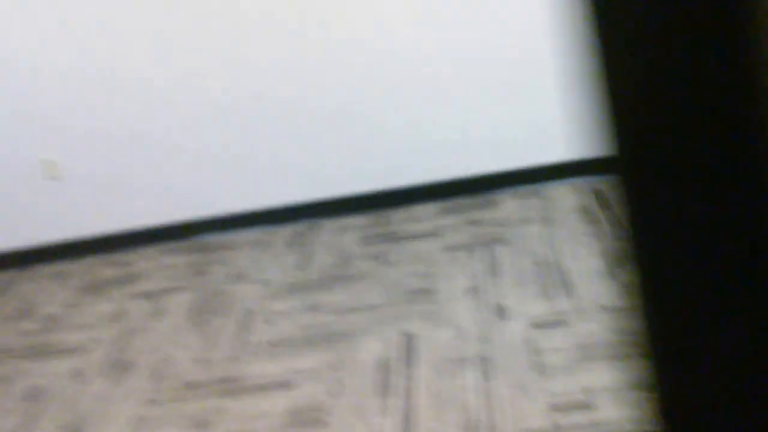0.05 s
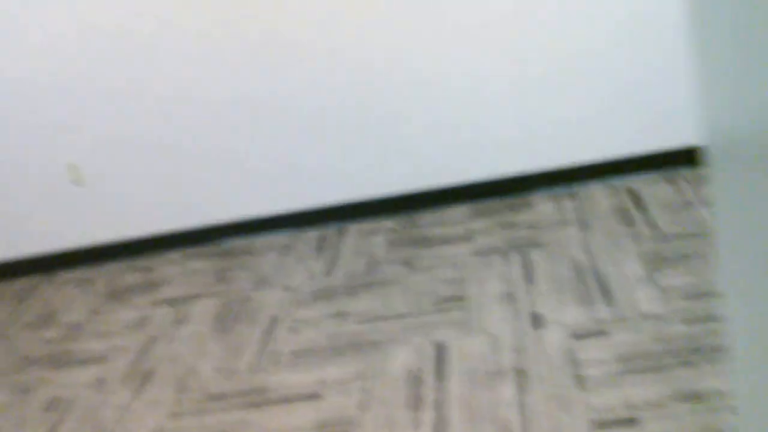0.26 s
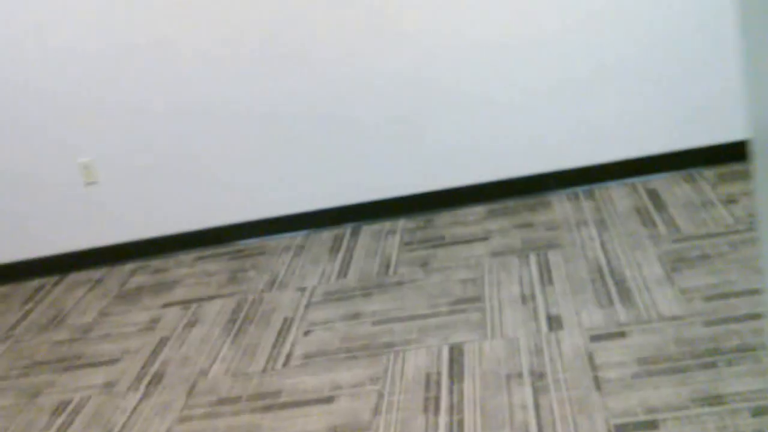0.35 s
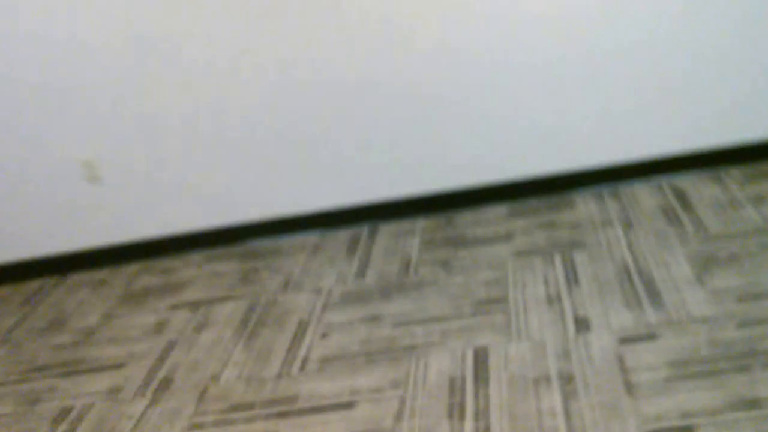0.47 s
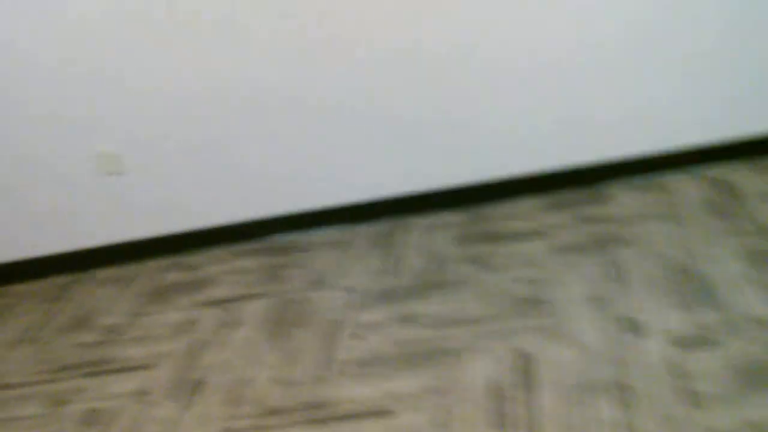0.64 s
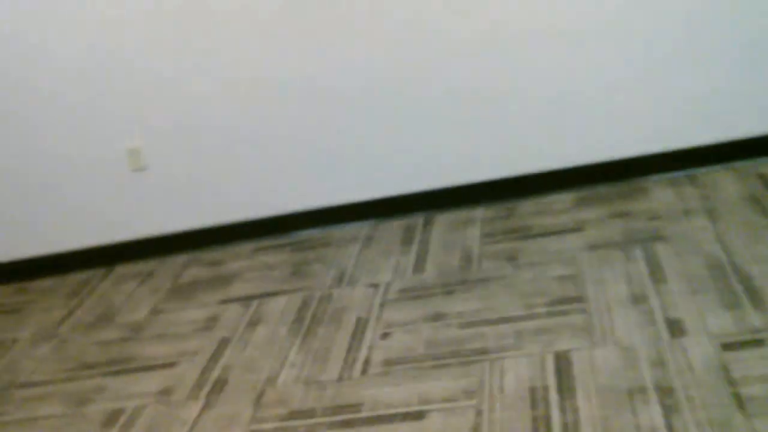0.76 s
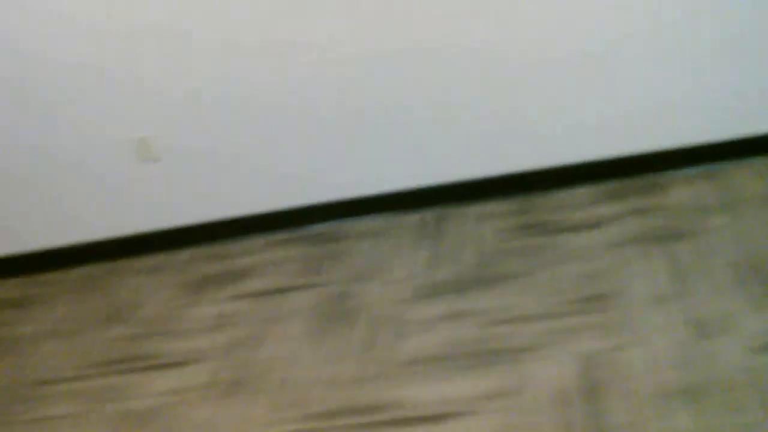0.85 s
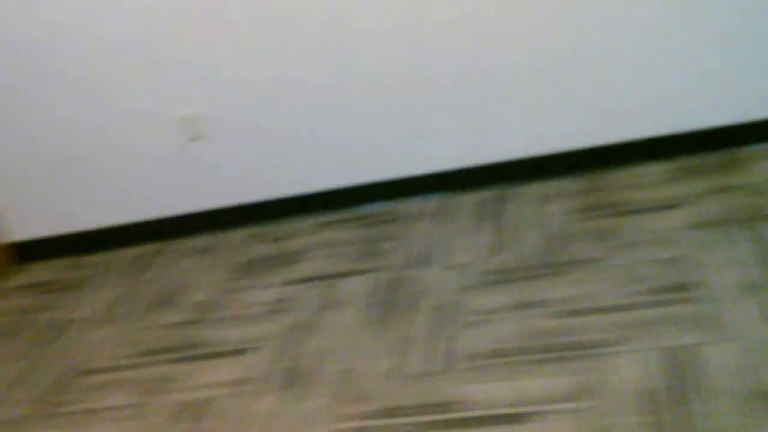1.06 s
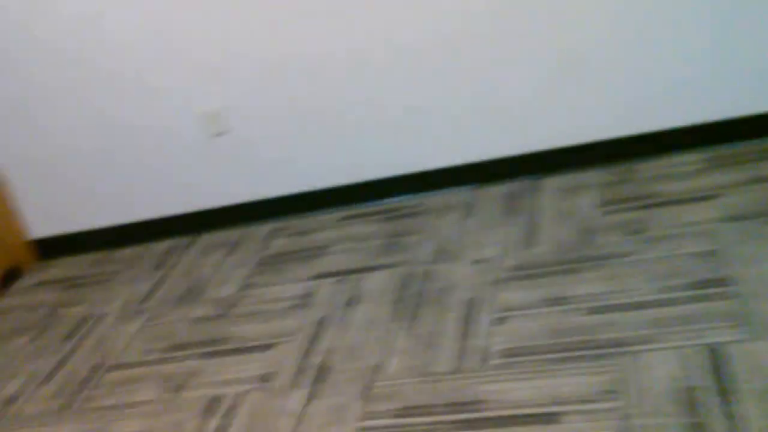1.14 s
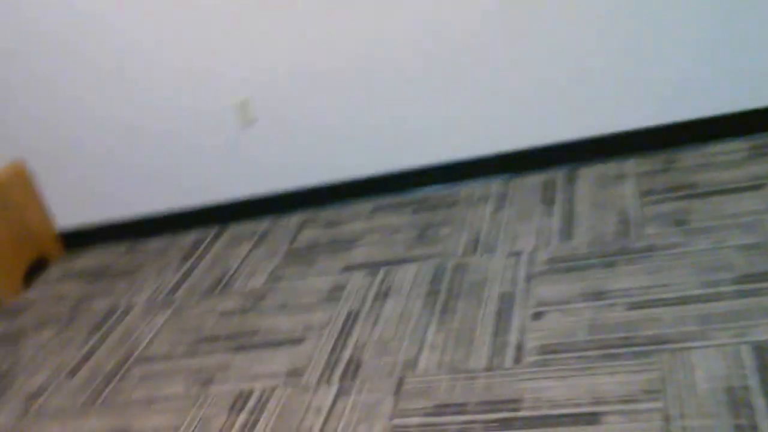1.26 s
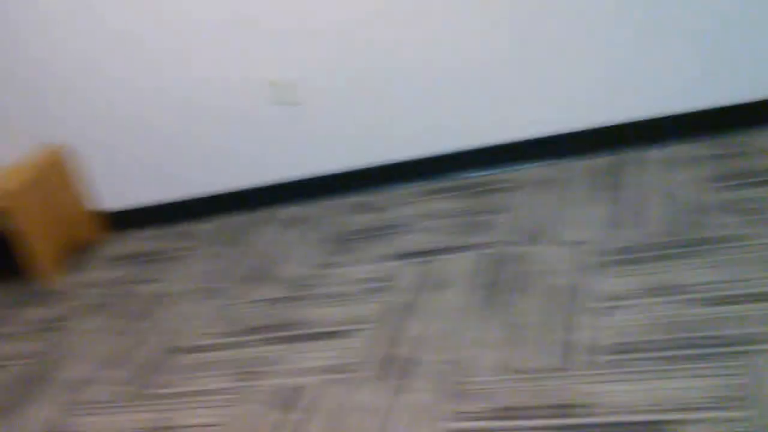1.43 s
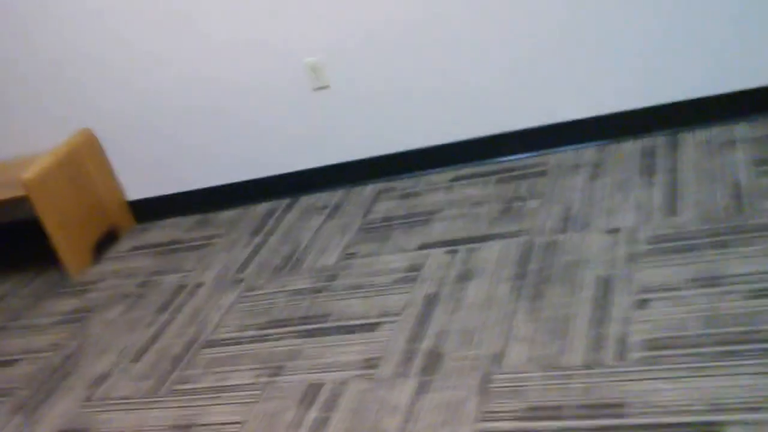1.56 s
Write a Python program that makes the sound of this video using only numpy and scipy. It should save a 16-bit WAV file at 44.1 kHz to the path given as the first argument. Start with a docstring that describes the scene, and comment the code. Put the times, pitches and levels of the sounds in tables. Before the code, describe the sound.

A single sharp latch snap is the main sound, at about 1.1 seconds, with a brief metallic ring and short hallway echo. Earlier, something brushes the hand-held microphone, rumbling and scraping, with a very high squeak near 0.15 seconds and light metal clinks until 0.5. After the snap comes a faint airy hiss, with two tiny ticks around 1.35. Ventilation hum and soft handling bumps run underneath.

```python
"""Something brushes past a hand-held microphone as it moves by a door into a quiet carpeted hallway.
The friction rumbles, scrapes and gives a very high squeak, among a few light metal clinks.
Then a latch snaps once: three quick contacts ring its metal, and the walls throw the snap back.
Ventilation hums underneath, the hallway resonates, and a soft hiss of movement comes and goes."""
import sys
import numpy as np
from scipy import signal
from scipy.fft import rfft, irfft
from scipy.io import wavfile

SR = 44100
rng = np.random.default_rng(int(sys.argv[2]) if len(sys.argv) > 2 else 0)


def persist_wave(psi):
    """Save psi, clipped to +-1, as 16-bit WAV."""
    counts = np.round(np.clip(psi, -1, 1) * 32767).astype(np.int16)
    wavfile.write(sys.argv[1], SR, np.atleast_2d(counts).T)


N = 70560
T = np.arange(N) / SR
BIN_HZ = np.fft.rfftfreq(N, 1 / SR)


def amp(db):
    """Decibels to gain."""
    return 10 ** (np.asarray(db) / 20)


def unit_rms(x):
    """Scales a signal to unit rms."""
    return x / np.sqrt(np.mean(x ** 2) + 1e-20)


def curve(points):
    """Straight ramps through (time_s, value) points."""
    return np.interp(T, *np.transpose(points))


def noise(colour, grain=1):
    """Unit-rms noise, roughened by the gain `grain`, then shaped by (freq_hz, level_db) points."""
    hz, db = np.transpose(colour)
    eq = amp(np.interp(np.log(BIN_HZ + 1), np.log(hz), db))
    low_cut = BIN_HZ ** 2 / (BIN_HZ ** 2 + (hz[0] / 2) ** 2)
    return unit_rms(irfft(rfft(rng.standard_normal(N) * grain) * eq * low_cut, N))


def resonance(hz, width_hz):
    """Unit-rms noise in one peak, 6 dB down at width_hz either side."""
    peak = 1 / (1 + ((BIN_HZ - hz) / width_hz) ** 2)
    return unit_rms(irfft(rfft(rng.standard_normal(N)) * peak, N))


def wander(rate_hz):
    """Smooth random modulation at unit rms."""
    low_pass = np.exp(-(BIN_HZ / rate_hz) ** 2)
    return unit_rms(irfft(rfft(rng.standard_normal(N)) * low_pass, N))


def tone(pitch_hz):
    """A unit-rms sine that follows a pitch curve."""
    return np.sqrt(2) * np.sin(2 * np.pi * np.cumsum(pitch_hz) / SR)


def strike(start_s, rise_s, t60_s, hold_s=0):
    """Envelope: linear attack, hold, exponential decay."""
    t = T - start_s
    return np.clip(t / rise_s, 0, 1) * amp(-60 * np.maximum(t - rise_s - hold_s, 0) / t60_s)


def ping(start_s, hz, rise_s, t60_s, phase=0):
    """One struck, decaying sine; phase is in cycles."""
    return strike(start_s, rise_s, t60_s) * np.sin(2 * np.pi * (hz * (T - start_s) + phase))


def ventilation():
    """Steady rushing air under a wavering hum and a hollow drone that swell and fade."""
    air_colour = [(20, 3), (40, -3.5), (70, -2), (130, -8.5), (240, -4), (330, -18), (480, -19), (850, -22),
                  (1200, -28), (2500, -28.5), (4000, -32.5), (6500, -45.5), (11000, -37.5), (16000, -32)]  # air spectrum: freq_hz, level_db
    hum_level = [(0, -40.5), (.13, -37.5), (.42, -45), (.7, -47), (1.15, -55.5), (1.25, -38), (1.32, -50),
                 (1.39, -32.5), (1.472, -45), (1.56, -30.5), (1.6, -33)]  # low hum swells: time_s, level_db
    drone_level = [(0, -38.5), (.05, -31), (.12, -36.5), (.24, -36), (0.329, -51), (0.373, -27),
                   (.43, -42.5), (.68, -51.5), (.79, -38.5), (.87, -49.5), (1.009, -42.5), (1.1, -58.5),
                   (1.6, -51.5)]  # drone swells: time_s, level_db
    drone_pitch = [(0, 267), (.42, 266.7), (.75, 243.5), (1.6, 243)]  # sinking drone: time_s, pitch_hz
    hum_hz = 121.7
    air = amp(-42.5) * noise(air_colour)
    hum = amp(curve(hum_level)) * tone(hum_hz + 2.23 * wander(21.8))
    drone = amp(curve(drone_level)) * tone(curve(drone_pitch) + 6.68 * wander(21.8))
    return air + hum + drone


def handling():
    """The moving hand gives the microphone a low rumble and soft, damped bumps."""
    rumble_level = [(0, -35), (.19, -36), (.25, -24), (.31, -29), (.37, -35.5), (.45, -27), (.51, -54),
                    (.6, -32), (.7, -72), (1.6, -45)]  # rumble surges: time_s, level_db
    rumble_colour = [(15, -1.5), (36, 1), (55, -11), (100, -7.5), (200, -18.5), (500, -31), (2000, -96)]  # rumble spectrum: freq_hz, level_db
    bumps = [(0.224, 36.5, -22), (.575, 109.2, -27.5), (0.783, 243, -58), (0.989, 227, -27.5),
             (1.221, 199, -29.5)]  # low thuds: start_s, pitch_hz, level_db
    thuds = sum(amp(db) * ping(s, hz, rise_s=.0025, t60_s=.076) for s, hz, db in bumps)
    return amp(curve(rumble_level)) * noise(rumble_colour) + thuds


def brushing():
    """Something brushes by with a soft, dark friction noise that stirs the hallway."""
    brush_level = [(0, -43.5), (.07, -35.5), (.14, -27.5), (.2, -30.5), (.3, -40), (.45, -38.5),
                   (.57, -39.5), (.7, -47), (1, -55), (1.3, -52.5), (1.45, -47), (1.6, -47)]  # brushing swell: time_s, level_db
    brush_colour = [(60, 1.5), (180, 2.5), (350, 1), (500, -5.5), (780, -6), (1150, -16), (2200, -20),
                    (3500, -31), (7000, -27)]  # brushing spectrum: freq_hz, level_db
    swell = amp(curve(brush_level))
    return swell * noise(brush_colour) + hallway(swell)


def hallway(brush_swell):
    """Hollow room resonances, fed steadily by the air and lifted by the brushing."""
    modes = [(191.7, 9.5, -49, -18.5), (299, 6.1, -51, -18.5), (378, 35, -53.5, -12),
             (522.4, 16, -81, -16.5), (619.4, 11, -59.5, -13), (873, 76, -62.5, -18),
             (2480, 350, -64.5, -39)]  # room modes: pitch_hz, width_hz, steady_db, brush_send_db
    return sum(np.hypot(amp(steady_db), amp(send_db) * brush_swell) * resonance(hz, width_hz)
               for hz, width_hz, steady_db, send_db in modes)


def hiss():
    """A light, fluttering hiss of movement comes and goes."""
    hiss_level = [(0, -35), (.1, -42.5), (.18, -33), (.28, -38.5), (.45, -41), (.56, -44), (.67, -55.5),
                  (.715, -51), (.79, -61.5), (.9, -54), (.99, -71), (1.6, -79)]  # hiss swells: time_s, level_db
    hiss_colour = [(1000, -10), (2000, -4), (2900, -1.5), (3600, -7.5), (4500, -5), (5600, -3.5),
                   (6800, -6.5), (8000, -2), (10600, 2), (12500, -1), (16000, -4)]  # hiss spectrum: freq_hz, level_db
    flutter_db = 1.6 * wander(51)
    return amp(curve(hiss_level) + flutter_db) * noise(hiss_colour)


def rub():
    """A band of friction noise that sinks as the movement slows."""
    glide = [(0, 2750, -43), (0.061, 2750, -68), (0.151, 3000, -42), (0.271, 2880, -56), (.35, 2500, -53),
             (.41, 2050, -53.5), (0.439, 2120, -43), (.48, 2100, -58), (.62, 2000, -56), (.75, 2000, -72)]  # rubbing resonance: time_s, pitch_hz, level_db
    times, pitches, levels = np.transpose(glide)
    width_hz = 330
    carrier = np.exp(2j * np.pi * np.cumsum(np.interp(T, times, pitches)) / SR)
    spread = wander(width_hz) + 1j * wander(width_hz)  # smears the pitch into a band
    return amp(np.interp(T, times, levels)) * unit_rms((carrier * spread).real)


def clinks():
    """Small metal parts knock together, each a bright burst with a short tail."""
    hits = [(0.0722, -27.5), (0.0963, -22), (0.317, -21.5), (0.3987, -24), (.4194, -62), (0.4971, -35)]  # metal contacts: start_s, level_db
    clink_colour = [(3000, -50), (4400, -21), (5600, -6), (6500, -17), (7600, -11), (8500, -12.5),
                    (10700, 1), (11800, -5.5), (13500, -18), (16000, -12)]  # metal spectrum: freq_hz, level_db
    envelope = np.zeros(N)
    for s, db in hits:
        burst = strike(s, rise_s=.00078, t60_s=.043)
        tail = amp(-11) * strike(s, rise_s=.017, t60_s=.2)
        envelope += amp(db) * (burst + tail)
    return envelope * noise(clink_colour)


def knocks():
    """Hollow knocks along the brushing, each ringing one narrow resonance."""
    hits = [(0.078, 744, -33), (0.125, 752, -33.5), (.49, 1040, -46.5), (.53, 400, -36)]  # soft knocks: start_s, pitch_hz, level_db
    return sum(amp(db) * strike(s, rise_s=.0061, t60_s=.22) * resonance(hz, width_hz=53)
               for s, hz, db in hits)


def scrape():
    """The friction turns gritty at the height of the brushing."""
    scrape_colour = [(1000, -9), (2500, -7), (3000, -2.5), (3450, -13), (4700, 2.5), (6100, -3), (6650, -7),
                     (7150, 1), (7900, -19), (9600, -4), (12000, -19), (16000, -8.5)]  # grit spectrum: freq_hz, level_db
    grit = noise(scrape_colour, grain=amp(2.5 * wander(580)))
    return amp(-30) * strike(.12, rise_s=.011, t60_s=.18, hold_s=.042) * grit


def squeak():
    """Friction sings in three quick slips of a sagging tone with faint side tones; the hall echoes it."""
    slips = [(.1445, .016, 13350, -9.5), (.164, .009, 13310, -11), (.1765, .019, 13260, -10),
             (.161, .02, 15080, -33), (.16, .022, 13870, -36)]  # slips and side tones: start_s, length_s, pitch_hz, level_db
    rise_s, fall_s, sag_hz_per_s, jitter_hz = .006, .003, 2000, 22
    direct = np.zeros(N)
    for s, length_s, hz, db in slips:
        t = T - s
        pitch = hz - sag_hz_per_s * np.clip(t, 0, 2 * length_s) + jitter_hz * wander(100)
        envelope = np.clip(t / rise_s, 0, 1) * np.exp(-np.maximum(t - length_s, 0) / fall_s)
        direct += amp(db) * envelope * tone(pitch)
    room = rng.standard_normal(N) * strike(.0033, rise_s=.0022, t60_s=.21)
    reverb = signal.fftconvolve(direct, room / np.linalg.norm(room))[:N]
    return direct + amp(-11.5) * reverb


def tap():
    """One duller tap after the clinks leaves a faint ring."""
    tap_colour = [(1500, -33), (3100, -11), (3700, 3.5), (4400, -3), (5200, -19), (7100, 1.5), (8000, -3),
                  (9000, -16), (12000, -30)]  # tap spectrum: freq_hz, level_db
    start_s = .5305
    hit = amp(-32.5) * strike(start_s, rise_s=.0005, t60_s=.068) * noise(tap_colour)
    ring = amp(-51) * strike(start_s, rise_s=.001, t60_s=.3) * resonance(3680, width_hz=71)
    return hit + ring


def latch():
    """One snap: three quick contacts crack and ring the metal, and the walls answer."""
    contacts = [(1.0786, -29, -30), (1.081, -13, -4), (1.0842, -14.5, -1)]  # latch impacts: start_s, crack_db, ring_db
    crack_colour = [(1000, -45), (3000, -28), (6400, -7.5), (7900, -25), (9200, 4), (10500, -2.5),
                    (11200, -7), (12700, 0), (14000, -21), (16000, -6)]  # impact spectrum: freq_hz, level_db
    modes = [(2374, -12, .28), (3397, -8, .12), (4468, -5, .14), (5800, -11, .14), (6336, -13, .25),
             (6697, -9, .18), (8960, -9, .2), (9123, -7, .17), (9372, -7, .16), (9555, -6, .16),
             (10450, -3, .12), (11750, -10, .16), (12736, -7, .18)]  # ringing metal: pitch_hz, level_db, t60_s
    wall_colour = [(600, -46), (1200, -24), (2300, -9.5), (3100, -13.5), (4400, -6), (5500, -9.5),
                   (6500, -2), (7900, -19), (9300, 1), (11000, -8), (12700, -6), (14000, -15),
                   (16000, -12.5)]  # reflection spectrum: freq_hz, level_db
    ring_trim_db, reflection_s = -34, 1.0818
    snap = np.zeros(N)
    for s, crack_db, ring_db in contacts:
        snap += amp(crack_db) * strike(s, rise_s=.0005, t60_s=.007, hold_s=.0012) * noise(crack_colour)
        for hz, mode_db, t60_s in modes:
            ring = ping(s, hz, rise_s=.00032, t60_s=t60_s, phase=rng.random())
            snap += amp(ring_trim_db + ring_db + mode_db) * ring
    early = amp(-24) * strike(reflection_s, rise_s=.001, t60_s=.14)
    late = amp(-40) * strike(reflection_s, rise_s=.01, t60_s=.45)
    return snap + (early + late) * noise(wall_colour)


def slide():
    """An airy sliding hiss with a thin whistle in it swells after the snap."""
    slide_level = [(1.05, -64), (1.13, -42), (1.22, -44.5), (1.37, -47), (1.52, -50.5), (1.6, -56)]  # sliding swell: time_s, level_db
    slide_colour = [(2000, -6.5), (5500, -11.5), (7800, -3.5), (9500, -5.5), (11000, 0), (12700, -2),
                    (14300, -1), (16000, -3.5)]  # airy spectrum: freq_hz, level_db
    whistle = amp(-13.5) * resonance(10670, width_hz=70)
    return amp(curve(slide_level)) * (noise(slide_colour) + whistle)


def ticks():
    """Two tiny, dry ticks right at the microphone."""
    hits = [(1.3394, -29), (1.3534, -15)]  # close ticks: start_s, level_db
    return sum(amp(db) * ping(s, hz=13000, rise_s=.00015, t60_s=.0013) for s, db in hits)


def scene():
    """All sources at one microphone, the same in both channels."""
    mono = ventilation() + handling() + brushing() + hiss() + rub()
    mono += clinks() + knocks() + scrape() + squeak() + tap() + latch() + slide() + ticks()
    return np.array([mono, mono])


def record(dry):
    """A steep low-pass trims the very top of the treble."""
    cutoff_hz = 15800
    low_pass = signal.firwin(401, cutoff_hz, window=("kaiser", 8), fs=SR)
    return signal.oaconvolve(dry, low_pass[None], "same")


dry = scene()
out = record(dry)
persist_wave(out)
```